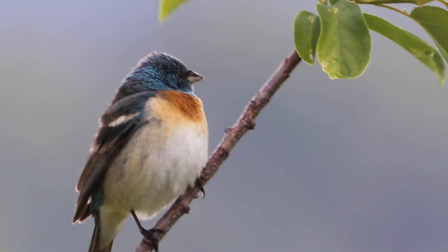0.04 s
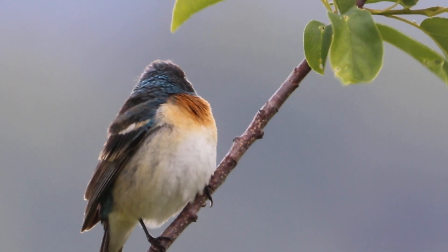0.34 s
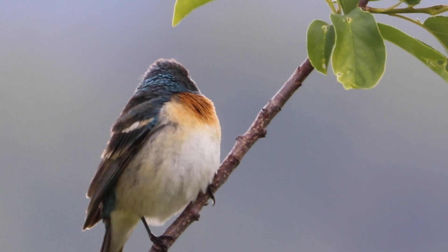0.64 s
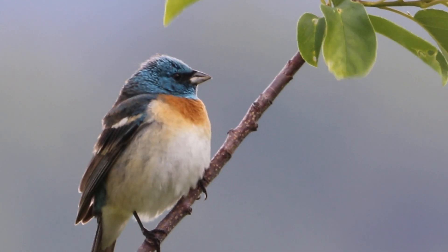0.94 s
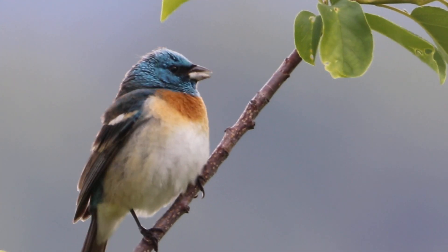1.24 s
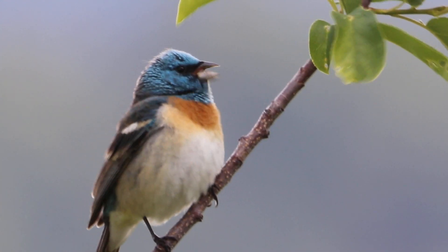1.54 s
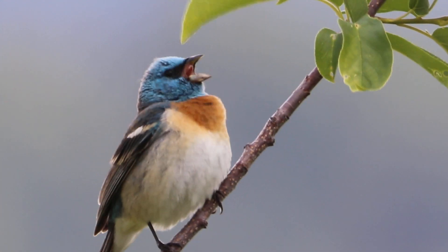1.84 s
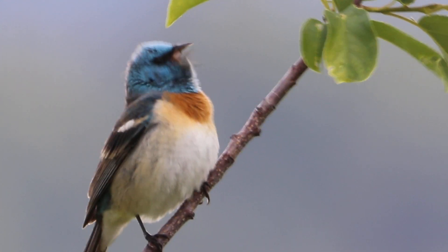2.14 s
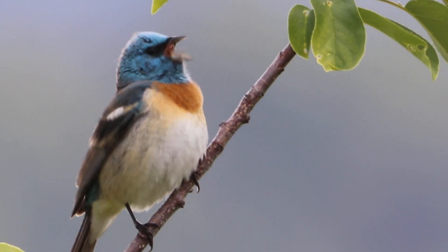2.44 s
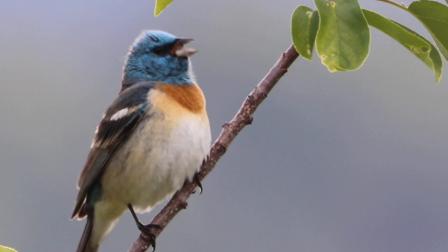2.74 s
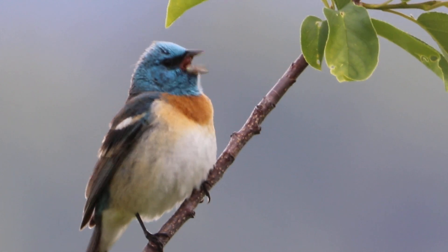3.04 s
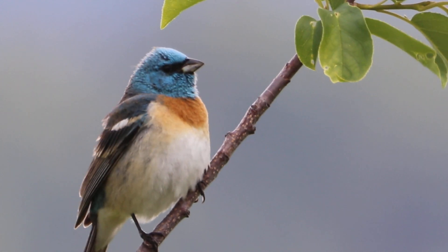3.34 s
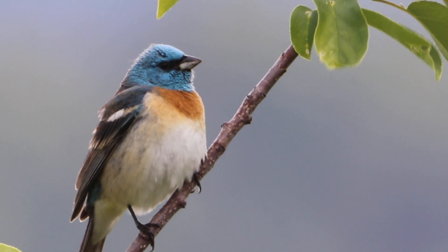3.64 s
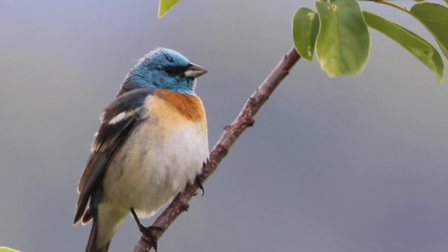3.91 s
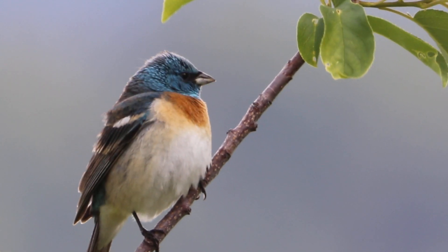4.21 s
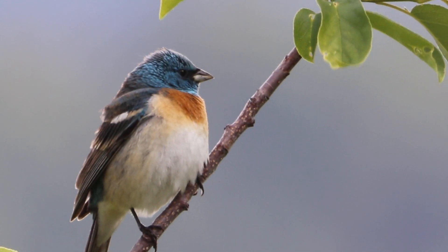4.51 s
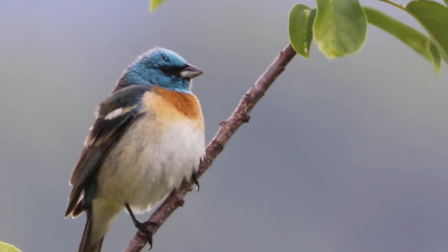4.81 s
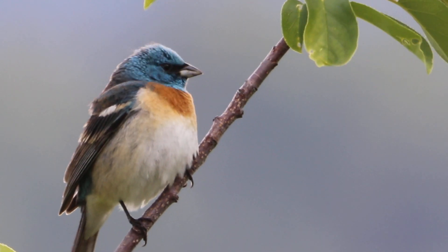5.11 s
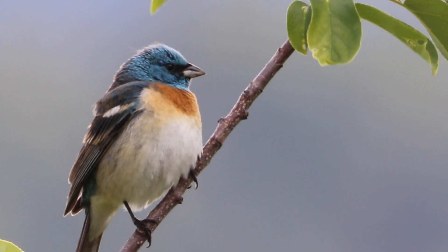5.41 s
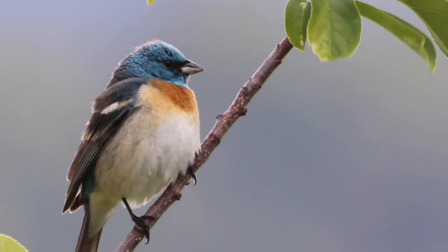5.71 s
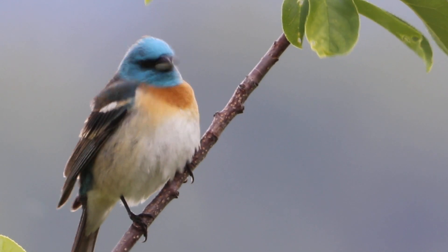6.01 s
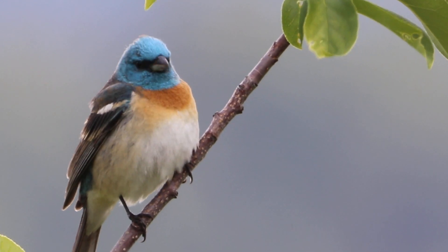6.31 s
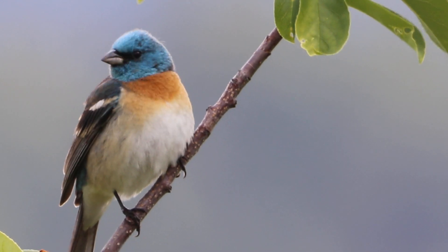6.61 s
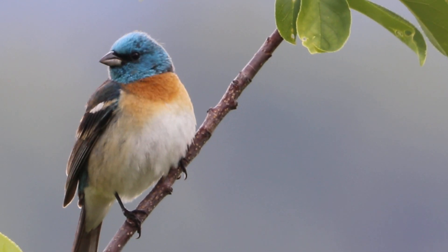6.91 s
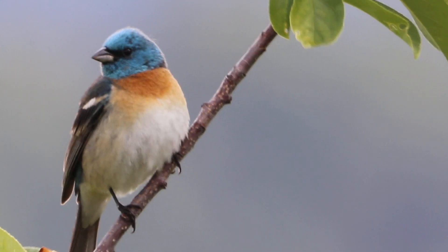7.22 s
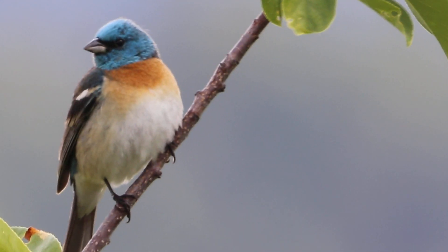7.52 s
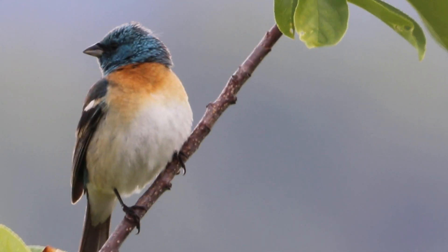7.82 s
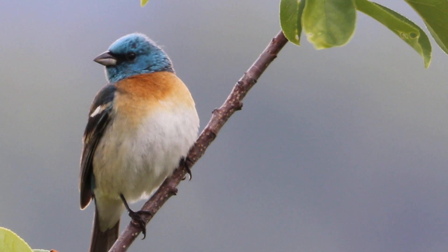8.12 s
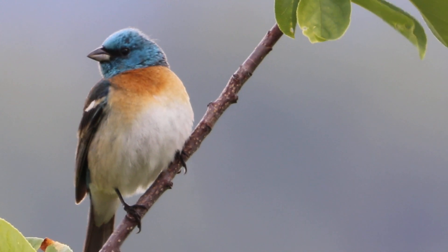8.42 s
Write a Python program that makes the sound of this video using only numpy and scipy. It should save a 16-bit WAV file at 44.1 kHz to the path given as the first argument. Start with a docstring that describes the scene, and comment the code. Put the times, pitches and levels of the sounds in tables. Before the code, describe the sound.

Outdoors among trees, distant birds chip and whistle faintly over a low rumble of moving air and a thin hiss. Early on, a small songbird close to the stereo microphone sings one quick, bright song: swooping notes growing louder, ticks, zigzags and two short buzzes, with a faint echo. Afterwards only the far birds continue, twittering more busily near the end. A few soft wind puffs touch the microphone.

```python
"""A bunting on a twig near a stereo microphone sings one quick song: rising slurs, ticks, zigzags and
two buzzes, all one tone from its syrinx, swept in pitch. A close reflection colours the sweeps, and
the trees give a faint echo. Other birds whistle, chip and rasp farther off, over a low rumble of
moving air, a few puffs on the microphone and a thin hiss."""
import sys
import numpy as np
from scipy import signal
from scipy.fft import rfft, irfft, next_fast_len
from scipy.io import wavfile
from scipy.ndimage import uniform_filter1d, map_coordinates

SR = 44100
rng = np.random.default_rng(int(sys.argv[2]) if len(sys.argv) > 2 else 0)


def digitize_waveform(pressure):
    """Quantize a signal to 16-bit integers and store it at the path in sys.argv[1].

    Rows of a 2-D input are taken as channels; values are limited to [-1, 1].
    """
    field = np.atleast_2d(pressure).T
    bounded = np.clip(field, -1, 1)
    quanta = np.round(bounded * 32767).astype(np.int16)
    wavfile.write(sys.argv[1], SR, quanta)


N = 377055

# The echo from the trees. Each row: frequency in Hz, seconds to die away by 60 dB.
TREE_DECAY = [(2000, 0.72), (4500, 0.59), (9000, 0.27)]


def amp(db):
    """Decibels to gain."""
    return 10 ** (np.asarray(db) / 20)


def unit(x):
    """x scaled to rms 1."""
    return x / np.sqrt(np.mean(x ** 2) + 1e-20)


def along(points, hz):
    """(Hz, value) points read on a log axis."""
    f, v = np.transpose(points)
    return np.interp(np.log(hz + 1), np.log(f + 1), v)


def wobble(rate, size):
    """A smooth random curve, rate knots a second."""
    knots = rng.standard_normal(int(size * rate / SR) + 4)
    return map_coordinates(knots, [np.arange(size) * rate / SR])


def filtered(x, response):
    """x times a complex response of frequency."""
    size = next_fast_len(N + SR // 4)
    return irfft(rfft(x, size) * response(np.fft.rfftfreq(size, 1 / SR)), size)[..., :N]


def add(track, s, sound):
    """Mix a sound into the track at s seconds."""
    part = track[max(round(s * SR), 0):][:len(sound)]
    part += sound[:len(part)]


def swell(s, half_length):
    """A bell-shaped envelope around s seconds."""
    return np.exp(-np.minimum(((np.arange(N) / SR - s) / half_length) ** 2 / 2, 20))


def fade(t, edge_s):
    """A note's soft start and end."""
    return np.clip(np.minimum(t, t[-1] - t) / edge_s, 0, 1)


def rush(colour):
    """Coloured stereo noise of rms 1, alike on both sides of the microphone in the bass."""
    # Each row: frequency in Hz, likeness of left and right from 0 to 1.
    likeness = [(100, 1), (250, 0.99), (500, 0.769), (800, 0.842), (1500, 0.5), (4000, .55), (8000, 0.162),
                (15000, 0.224)]

    def response(hz):
        angle = np.arccos(np.clip(along(likeness, hz), -1, 1)) / 2
        return amp(along(colour, hz)) * [np.cos(angle), np.sin(angle)]

    mid, side = filtered(rng.standard_normal((2, N)), response)
    return unit(np.array([mid + side, mid - side]))


def air():
    """Moving air rumbles and now and then puffs on the microphone, under an even hiss."""
    # The rumble's slow drift. Each row: time in seconds, level in dB.
    drift = [(0.0, -50.5), (1.69, -50.5), (1.86, -49), (3.67, -52), (4.21, -51), (5.38, -53.5),
             (6.79, -50.5), (8.55, -51.5)]
    # Air striking the microphone. Each row: peak time in seconds, half length in seconds, level in dB.
    puffs = [(0.054, 0.059, -42.5), (0.998, 0.018, -29.5), (1.064, 0.0095, -27.5), (1.853, 0.028, -38),
             (2.694, 0.045, -33), (7.391, 0.026, -32.5), (7.622, 0.042, -43), (8.081, 0.0418, -41.5)]
    # The three spectra. Each row: frequency in Hz, relative level in dB.
    rumble_colour = [(12, -30), (20, -11), (38, -0.5), (92, 1.5), (147, -6.5), (168, -12), (238, -14),
                     (269, -18), (300, -21.5), (338, -26.5), (500, -34), (650, -77), (1100, -120)]
    puff_colour = [(12, -39), (20, -8), (54, 0.5), (80, 2.5), (158, -16.5), (198, -24.5), (271, -31),
                   (400, -64.5), (520, -79.5), (880, -120)]
    hiss_colour = [(150, -41), (300, 16.5), (500, 10), (650, 9.5), (790, 14), (900, 7), (1500, 4),
                   (2500, 2.5), (4200, 1.5), (6500, 1), (10000, 0), (16000, -0.5)]
    drift_db = np.interp(np.arange(N) / SR, *np.transpose(drift))
    rumble = amp(drift_db + 0.5 + 0.34 * wobble(8, N)) * rush(rumble_colour)
    puffing = sum(amp(db) * swell(s, half_length) for s, half_length, db in puffs)
    return rumble + puffing * rush(puff_colour) + amp(-64.5) * rush(hiss_colour)


def syrinx(pitch, waver, overtone_db):
    """A bird's voice: a slightly unsteady tone with weak overtones."""
    unsteady_hz = pitch * (1 + waver * wobble(912, len(pitch)))
    phase = 2 * np.pi * np.cumsum(unsteady_hz) / SR
    overtones = sum(np.sin(k * phase) * (k * pitch < SR / 2) for k in (2, 3))
    return np.sqrt(2) * (np.sin(phase) + amp(overtone_db) * overtones)


def glide(length, start_hz, middle_hz, end_hz, waver):
    """One whistled note, bending through three pitches."""
    t = np.arange(int(length * SR)) / SR
    pitch = np.polyval(np.polyfit([0, .5, 1], [start_hz, middle_hz, end_hz], 2), t / length)
    return fade(t, 0.11 * length) * syrinx(pitch, waver, overtone_db=-41)


def echo(x, decay):
    """Diffuse stereo echo, mostly from ahead; decay gives each frequency's time to fall 60 dB."""
    hz, t, spectra = signal.stft(rng.standard_normal((2, SR // 2)), SR, nperseg=256)
    dying = spectra * amp(-60 * t / along(decay, hz)[:, None])
    mid, side = signal.istft(dying, SR, nperseg=256)[1]
    tail = np.array([mid + 0.083 * side, mid - 0.029 * side]) / np.linalg.norm(mid)
    return signal.fftconvolve(x[None], tail, axes=1)[:, :N]


def sliding_bird():
    """A bird far off whistles thin, high slides, each weakening as it goes."""
    # Each row: start in seconds, length in seconds, first and last pitch in Hz, level in dB.
    slides = [(.037, .075, 7000, 3050, -67), (.15, 0.16, 4400, 3650, -77), (.268, .032, 4690, 5300, -63),
              (.325, .064, 5900, 3200, -67), (.553, .1, 6300, 3600, -67.5), (4.455, .075, 3500, 5150, -71),
              (4.758, .072, 5100, 4120, -69), (4.923, .024, 5250, 4340, -71),
              (5.134, 0.041, 5590, 4060, -73), (5.5, .031, 3530, 4460, -73), (5.615, .04, 3600, 4780, -73),
              (5.919, .04, 4760, 3390, -70.5), (6.03, .03, 4550, 5300, -69),
              (6.898, 0.12, 4770, 4550, -70.5), (7.539, 0.021, 3780, 3320, -66.5)]
    notes = np.zeros(N)
    for s, length, start_hz, end_hz, db in slides:
        middle_hz = 0.96 * np.sqrt(start_hz * end_hz)  # hangs just below an even glide
        note = glide(length, start_hz, middle_hz, end_hz, waver=0.006)
        add(notes, s, amp(db + np.linspace(2, -3, len(note))) * note)
    return notes + amp(-7) * echo(notes, TREE_DECAY)


def twitter(start, end, count, centre_hz, db, length_s, sweep):
    """Faint chirps, mostly falling, at random pitches and loosely spread in time."""
    chirps = np.zeros(N)
    for k, (when, length, height, slope, softness) in enumerate(rng.random((count, 5))):
        hz = centre_hz * 2 ** (0.6 * (height - .5))
        bend = sweep * (slope - .2)
        chirp = glide(length_s * (.5 + length), hz * (1 + bend), hz, hz * (1 - bend), waver=0.0089)
        add(chirps, start + (k + when) / count * (end - start), amp(db - 3 * softness) * chirp)
    return chirps


def far_chorus():
    """Distant birds among the trees: scattered chirps throughout, a busy twittering near the end."""
    sparse = twitter(0, 8.5, count=50, centre_hz=4310, db=-74, length_s=.026, sweep=0.202)
    busy = twitter(6.85, 8.1, count=45, centre_hz=4060, db=-73, length_s=.024, sweep=0.196)
    chirps = sparse + busy
    return chirps + amp(-2.5) * echo(chirps, TREE_DECAY)


def chipping_bird():
    """A far bird repeats a call of four crisp falling chips, never quite the same."""
    # Each entry: the start of a call in seconds.
    call_starts = [.257, .729, 1.111, 1.496, 1.84, 2.269, 3.381, 3.783, 4.206, 4.571, 4.979, 5.63, 6.157,
                   6.682, 7.206, 7.827, 8.344]
    length_s, middle_hz, fall_hz = 0.013, 5310, 280
    gap_s, slowing_s = .031, .0033  # the chips spread out as the call goes on
    calls = np.zeros(N)
    for s in call_starts:
        for k, (force, height) in enumerate(rng.standard_normal((4, 2))):
            start_hz = (middle_hz + fall_hz) * (1 + 0.012 * height)
            chip = glide(length_s, start_hz, middle_hz, middle_hz - fall_hz, waver=0.026)
            db = (-58.5 if k else -65) + 0.77 * force  # each call opens softly
            envelope = amp(db) * np.sqrt(np.hanning(len(chip)))
            add(calls, s + gap_s * k + slowing_s * k ** 2, envelope * chip)
    return calls + amp(-14.5) * echo(calls, TREE_DECAY)


def bunting_note(pitch, level_db, overtone_db):
    """One note of the bunting; a harder-driven syrinx is both brighter and rougher."""
    effort = amp(level_db) * fade(np.arange(len(pitch)) / SR, edge_s=0.0018)
    waver = 0.0087 + 0.092 * amp(overtone_db)
    return effort * syrinx(pitch, waver, overtone_db)


def close_reflection(x, share, spacing_hz, crest_hz):
    """A slightly late copy combs the spectrum, so every sweep flutters as it crosses the notches."""
    def comb(hz):
        return (1 + share * np.exp(-2j * np.pi * (hz - crest_hz) / spacing_hz)) / (1 + share)

    return filtered(x, comb)


def bunting():
    """The singer near the microphone: one tone led through each syllable, then two buzzes."""
    # Syllable shapes. Each row: seconds into the syllable, pitch in Hz, relative level in dB.
    slur = [(0, 5460, -17), (.008, 5074, 1), (.021, 4171, -1), (.037, 4100, -3.5), (.042, 3730, -19.5),
            (.067, 4910, 3), (.078, 6146, 4.5), (.091, 6520, 2.5), (.095, 6570, -16.5)]
    hook = [(0.0, 3410, -14), (0.0058, 7930, -7.5), (0.0108, 6480, -1.5), (0.0181, 5630, -25)]
    flick = [(0.0, 9800, -1.5), (0.0038, 7500, 1), (0.0098, 6330, 5), (0.02, 5622, -4)]
    drop = [(0.0, 9030, -12), (0.0038, 6117, -7), (0.0148, 5880, -4), (0.0198, 5870, -2)]
    arch = [(0, 3415, -21), (.013, 3810, -9), (.031, 4270, -3), (.043, 4940, 0), (.051, 5195, -1),
            (.058, 4800, -2.5), (.063, 4280, -7), (.071, 3700, -5), (.087, 2700, -20)]
    high_fall = [(0, 8200, -28), (.009, 8350, -21), (.02, 8490, -1.5), (.034, 7410, 2.5),
                 (.044, 6869, -2.5), (.058, 6894, -21)]
    zigzag = [(0, 5540, -18), (.008, 5880, -11), (.0133, 7170, -14), (.0168, 5560, -5.5), (.023, 4960, -1),
              (.0422, 3460, -9), (.0478, 4810, -3), (.056, 4755, 0), (.064, 4200, -18)]
    wave = [(0, 4950, -13), (.007, 3980, -2), (.017, 3014, -11), (.027, 3766, -1), (.036, 4120, -4),
            (.0445, 3784, -1), (.057, 2920, -12.5), (.066, 2920, -16)]
    crest = [(0, 3500, -16), (.014, 4720, -13), (.029, 5010, -.5), (.0435, 5350, -8), (.048, 5183, 5),
             (.0545, 4270, -4.5), (.069, 4340, -24)]
    # How hard each syllable is driven. Each entry: shape, overtone level in dB.
    syllables = {"slur": (slur, -39), "hook": (hook, -22), "flick": (flick, -23), "drop": (drop, -34),
                 "arch": (arch, -45.5), "high fall": (high_fall, -37), "zigzag": (zigzag, -42),
                 "wave": (wave, -39), "crest": (crest, -38)}
    # The song. Each row: start in seconds, time stretch, pitch factor, level in dB, syllable.
    phrase = [(1.307, 1.25, 1.04, -61.5, "slur"), (1.499, 1.157, 0.978, -49, "slur"),
              (1.672, 1.022, 1.016, -40, "slur"), (1.838, 0.97, 0.99, -34.5, "slur"),
              (1.977, 1.12, 1.005, -38.5, "hook"), (2.0, .96, 0.97, -39, "flick"),
              (2.024, 0.98, 0.99, -27, "drop"), (2.046, .98, 1, -25, "arch"),
              (2.186, 1.27, .995, -34, "hook"), (2.213, 0.94, 1.01, -40.5, "flick"),
              (2.237, 0.95, .995, -28, "drop"), (2.248, 1.06, 1.013, -26.5, "arch"),
              (2.403, 1.05, 1.008, -33.5, "high fall"), (2.494, .986, 1.013, -24.5, "zigzag"),
              (2.598, 1.13, 1.027, -24.5, "zigzag"), (2.717, 1.137, 0.98, -33.5, "high fall"),
              (2.811, 1.095, .99, -25.5, "zigzag"), (2.93, 1.01, 1, -30.5, "wave"),
              (2.999, 1.005, 1.004, -30.5, "crest")]
    # Its ending. Each row: start and length in seconds, sweeps a second, base pitch in Hz, level in dB.
    buzzes = [(3.137, 0.091, 49.5, 5350, -40), (3.26, .082, 48, 5510, -42)]
    song = np.zeros(N)
    for s, stretch, tuning, db, name in phrase:
        shape, overtone_db = syllables[name]
        knots, hz, shape_db = np.transpose(shape)
        t = np.arange(int(knots[-1] * stretch * SR)) / SR
        pitch = uniform_filter1d(np.interp(t, knots * stretch, hz * tuning), size=130)  # rounds corners
        level_db = db + np.interp(t, knots * stretch, shape_db)
        add(song, s, bunting_note(pitch, level_db, overtone_db))
    for s, length, rate, low_hz, db in buzzes:
        add(song, s, buzz(length, rate, low_hz, db))
    song = close_reflection(song, share=0.64, spacing_hz=599.8, crest_hz=173)
    # Nearby leaves scatter the tone briefly; the trees ring longer and more faintly.
    leaves = amp(-15) * echo(song, decay=[(5000, 0.087)])
    return song + leaves + amp(-30) * echo(song, TREE_DECAY)


def whistling_birds():
    """Arched, fluted notes from the neighbours; the fainter are farther off and carry more echo."""
    # Each row: start and length in seconds, middle pitch in Hz, slide in Hz, level in dB.
    whistles = [(1.675, 0.06, 2886, -60, -69.5), (1.71, 0.02, 2380, -750, -56),
                (1.714, .185, 2164, 18, -50.5), (2.292, 0.034, 3030, -100, -48.5),
                (2.402, 0.016, 2600, -160, -46), (2.427, .023, 2074, 100, -47.5),
                (2.46, 0.048, 3510, 100, -52.5), (2.54, 0.0263, 2950, -520, -50.5),
                (2.63, 0.016, 2520, -35, -48.5), (2.652, 0.03, 1970, 155, -51.5),
                (2.692, 0.037, 3000, -130, -52.5), (2.737, 0.013, 2330, -85, -47.5),
                (2.743, .124, 2055, 13, -51.5), (3.795, 0.058, 1810, -57, -70.5),
                (4, 0.021, 3350, 50, -68.5), (4.023, .076, 2365, -200, -66), (4.939, 0.07, 2010, 10, -67.5),
                (5.251, 0.061, 2900, 52, -74), (6.054, .033, 2450, -200, -69),
                (6.075, .095, 2085, -360, -70), (6.207, 0.28, 3205, -47, -70),
                (6.263, .061, 2580, -50, -70.5), (6.569, 0.2, 2465, 17, -60), (6.7, 0.16, 4130, -30, -77),
                (7.142, 0.019, 2340, 460, -60), (7.241, 0.041, 5050, -70, -69),
                (7.25, .185, 3590, 100, -75), (7.293, .02, 2620, 200, -63), (7.32, 0.0076, 3850, 0, -55.5),
                (7.384, .028, 2520, -450, -69.5), (7.447, .019, 2640, 200, -65),
                (7.478, 0.0074, 3880, 0, -56), (7.555, .14, 1930, -380, -72),
                (7.655, .19, 2457, -150, -62.5), (8.119, .108, 2140, -110, -75),
                (8.469, 0.053, 2550, -35, -73)]
    # Low, steep arches. Each row: start and length in seconds, top pitch in Hz, level in dB.
    chirrups = [(2.217, 0.0495, 2090, -54), (3.674, .055, 1800, -72.5), (4.228, 0.048, 2150, -70),
                (5.053, .066, 2560, -67.5)]
    sag = 0.0187  # a whistle's ends dip this share below an even glide
    gentle = [(s, length, hz * (1 - sag) - slide_hz / 2, hz, hz * (1 - sag) + slide_hz / 2, db)
              for s, length, hz, slide_hz, db in whistles]
    steep = [(s, length, 0.78 * hz, hz, 0.75 * hz, db) for s, length, hz, db in chirrups]
    notes, echoing = np.zeros(N), np.zeros(N)
    for s, length, start_hz, middle_hz, end_hz, db in gentle + steep:
        note = amp(db) * glide(length, start_hz, middle_hz, end_hz, waver=0.004)
        echo_db = np.interp(db, [-72, -48], [-7, -16])
        add(notes, s, note)
        add(echoing, s, amp(echo_db) * note)
    return notes + echo(echoing, TREE_DECAY)


def buzz(length, rate, low_hz, db):
    """The bunting swings its pitch quickly between round troughs and sharp peaks, creeping upward."""
    sweep_hz, climb_hz_per_s = 2800, 6000
    top_db, upstroke_db = -14, 6.5  # the tone thins at the top and is stronger on the way up
    t = np.arange(int(length * SR)) / SR
    turn = np.pi * (rate * t - 0.22)  # the first trough comes 0.22 of a cycle in
    height = 1 - np.abs(np.cos(turn))
    pitch = low_hz + climb_hz_per_s * t + sweep_hz * height
    level_db = db + top_db * height + upstroke_db * np.sin(2 * turn)
    return fade(t, edge_s=0.017) * bunting_note(pitch, level_db, overtone_db=-34)


def rasping_bird():
    """A far bird's evenly spaced hoarse pulses swell to one peak and fade."""
    # The rasp's spectrum. Each row: frequency in Hz, relative level in dB.
    colour = [(2600, -60), (3300, -14), (3900, 1), (4500, 3), (5000, -11), (6000, -60.5)]
    start_s, period_s = 7.597, 0.094
    peak_s, peak_db, fade_db_per_s = 8.44, -64.5, 10
    times = start_s + period_s * np.arange(11)
    pulses = sum(amp(peak_db - fade_db_per_s * abs(s - peak_s)) * swell(s, 0.011) for s in times)
    rasps = pulses * rush(colour)[0]
    return rasps + amp(-17) * echo(rasps, TREE_DECAY)


def scene():
    """Open air among trees: the bunting close by, the other birds farther off."""
    near = air() + bunting()
    return near + whistling_birds() + sliding_bird() + chipping_bird() + far_chorus() + rasping_bird()


def record(dry):
    """The recorder keeps nothing above 15750 Hz."""
    return filtered(dry, lambda hz: hz < 15750)


dry = scene()
out = record(dry)
digitize_waveform(out)
```